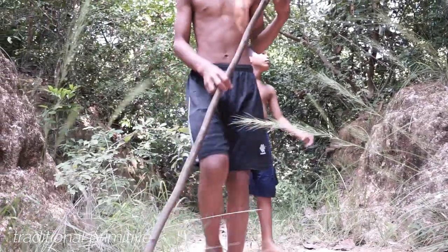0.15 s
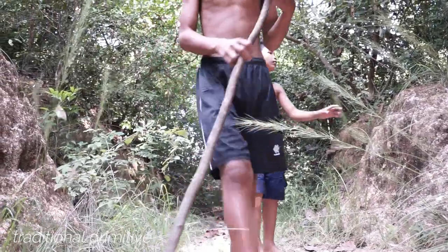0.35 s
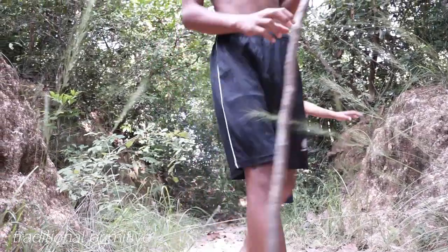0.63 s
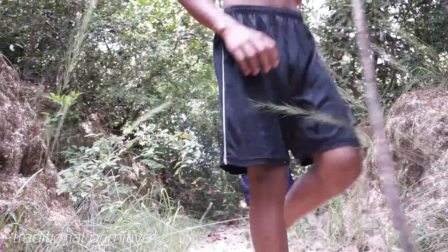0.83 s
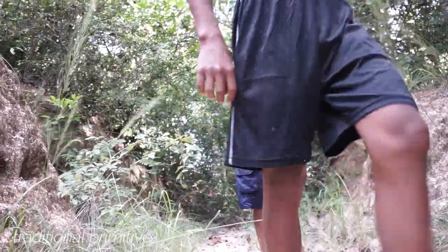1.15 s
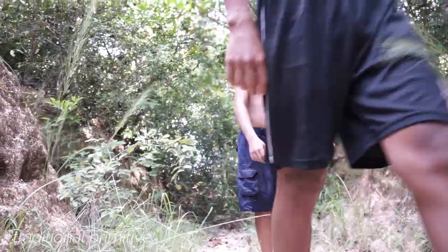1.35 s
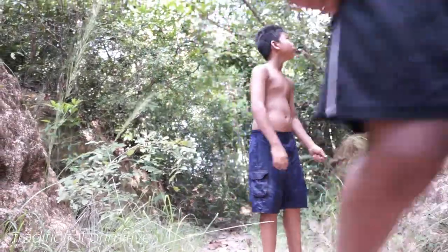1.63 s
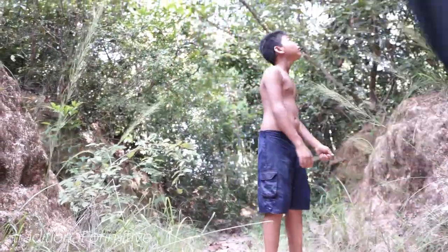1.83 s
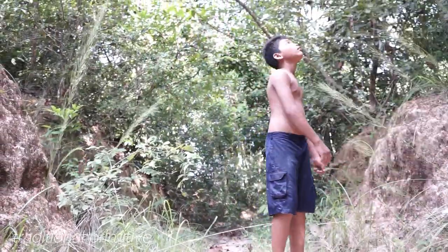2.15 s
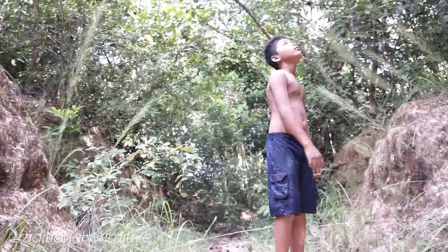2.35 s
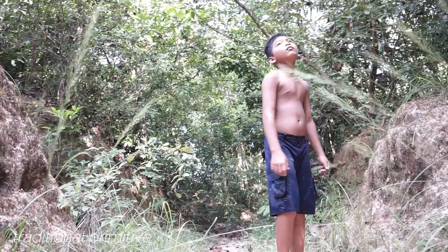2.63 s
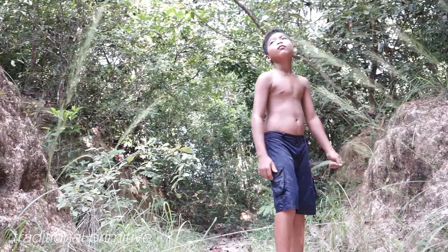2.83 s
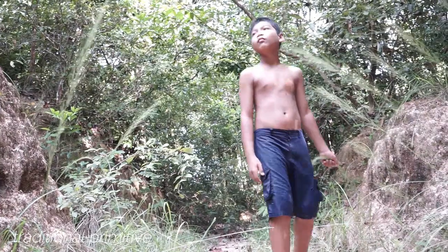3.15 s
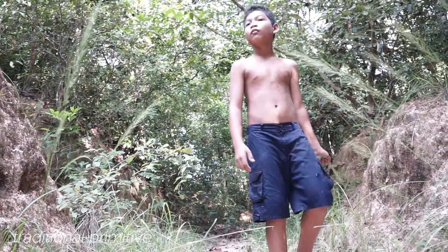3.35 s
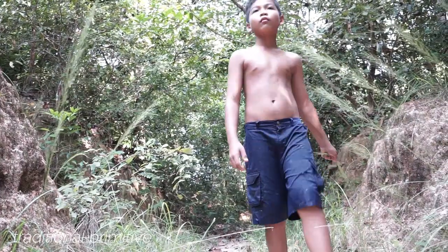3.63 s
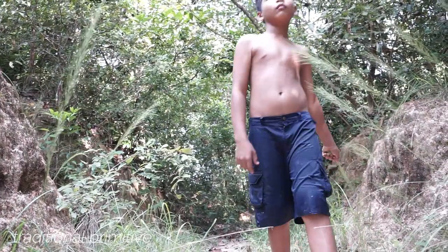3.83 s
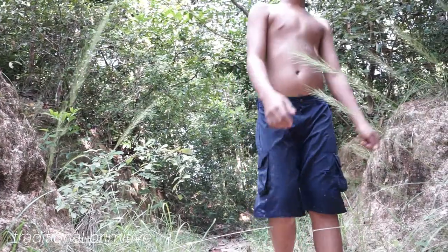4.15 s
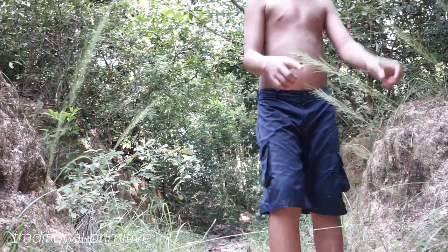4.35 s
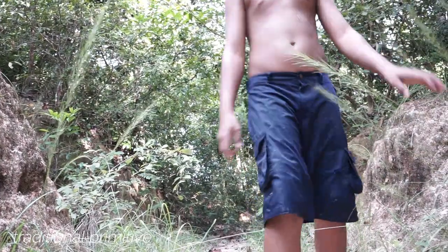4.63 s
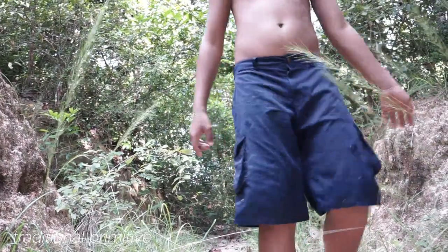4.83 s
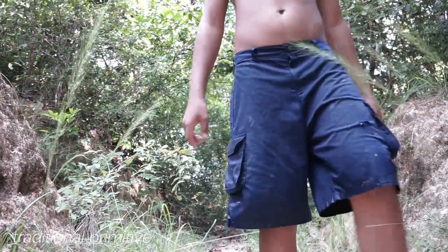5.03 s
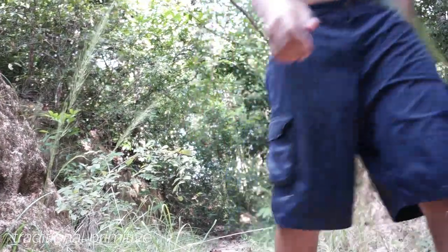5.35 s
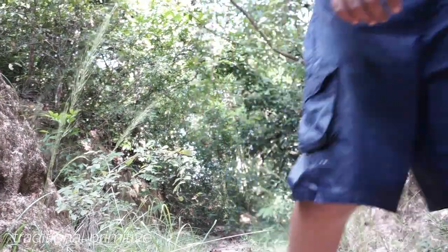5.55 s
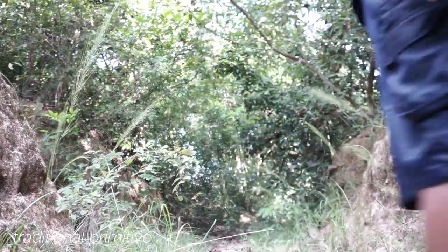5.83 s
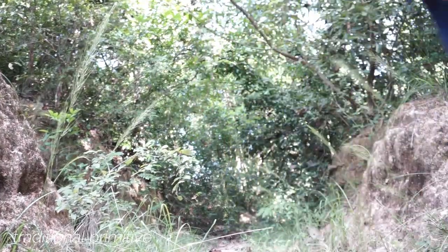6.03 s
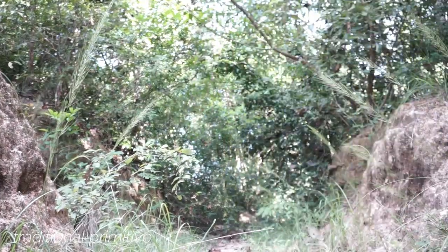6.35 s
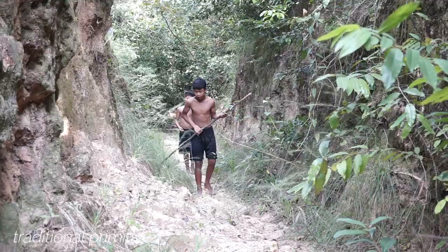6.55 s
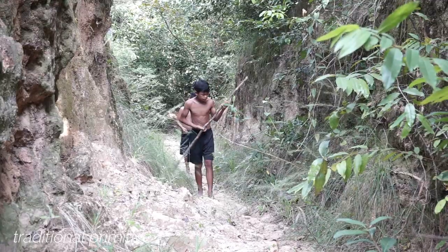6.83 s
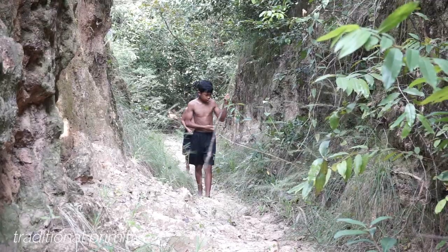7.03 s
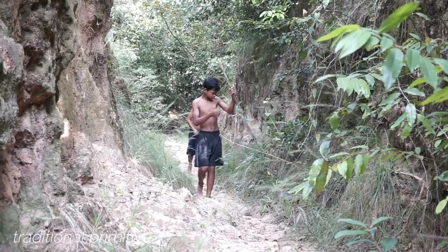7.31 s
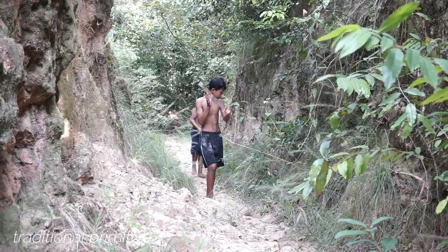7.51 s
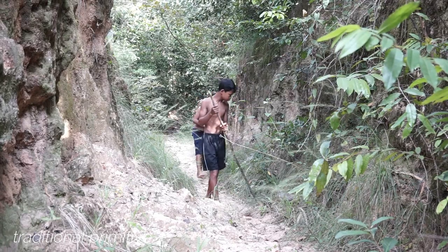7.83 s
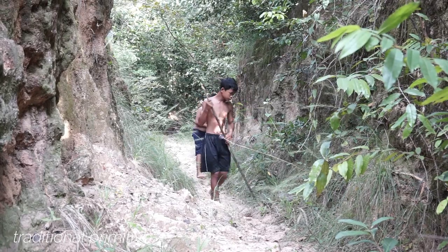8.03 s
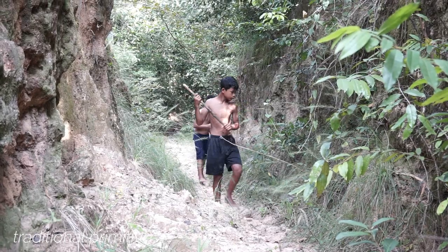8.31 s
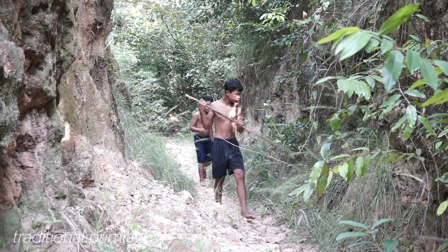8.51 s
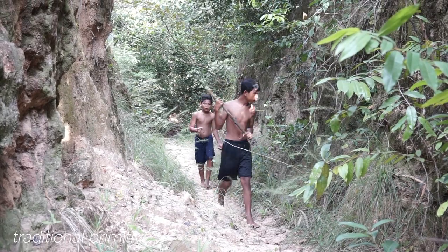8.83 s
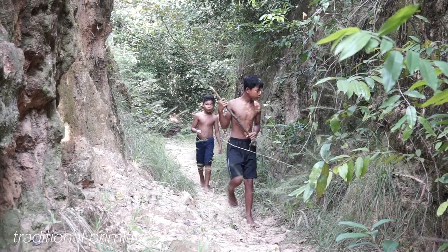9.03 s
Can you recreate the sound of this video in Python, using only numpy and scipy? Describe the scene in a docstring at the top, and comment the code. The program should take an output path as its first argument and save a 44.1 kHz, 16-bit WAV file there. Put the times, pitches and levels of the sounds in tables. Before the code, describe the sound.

Bare feet and legs crunch close by through dry grass and leaf litter, twigs snapping, then distant sparse rustles on a path over a faint engine hum.

```python
"""Litter crackles close by as two walkers pass on the right through dry grass and leaves, then along a far path:
clumped grains, sharp cracks and ringing ticks over smooth noise, pressed up by each crunch of a foot or leg.
Stems and twigs snap as noise bursts in short resonances; heels and a stick thud as clicks that ring the soil.
Below lie the two sine notes of a far engine, and the low rumble and the hiss of the wood as coloured noise.
The microphones are a left-right pair. The sound drops out twice for a moment, and the top is cut."""
import sys
import numpy as np
from scipy import signal
from scipy.io import wavfile

SR = 44100
rng = np.random.default_rng(int(sys.argv[2]) if len(sys.argv) > 2 else 0)


def inscribe(sig):
    """Save sig as 16-bit PCM at rate SR to the path in sys.argv[1].

    A 1-D sig is mono; a 2-D sig holds one channel per row.
    Samples are clipped to [-1, 1] before scaling.
    """
    pcm = np.round(np.clip(np.atleast_2d(sig).T, -1, 1) * 32767)
    wavfile.write(sys.argv[1], SR, pcm.astype(np.int16))


N = 404381
PATH_FROM_S = 6.52   # from here the walkers are far off on the path


def amp(db):
    """Decibels to gain."""
    return 10 ** (np.asarray(db) / 20)


def rms_one(x):
    """Scale to unit rms."""
    return x / np.sqrt(np.mean(x ** 2) + 1e-20)


def in_time(rows):
    """Columns of a curve table, one value per sample."""
    s, *columns = np.transpose(rows)
    return [np.interp(np.arange(N) / SR, s, c) for c in columns]


def at_hz(points, hz):
    """Read a spectrum on a log-frequency axis."""
    f, level = np.transpose(points)
    return np.interp(np.log(hz), np.log(f), level)


def drift(rate_hz):
    """Slow random wander of unit rms, drawn once every 40 samples."""
    step, settle = 40, 2000
    r = np.exp(-2 * np.pi * rate_hz * step / SR)
    noise = rng.standard_normal(N // step + settle + 2)
    slow = signal.lfilter([1], [1, -2 * r, r * r], noise)[settle:]
    return np.interp(np.arange(N) / step, np.arange(len(slow)), rms_one(slow))


def resonance(x, hz, t60):
    """A damped two-pole ring that dies by 60 dB in t60 seconds."""
    r, w = amp(-60 / (t60 * SR)), 2 * np.pi * hz / SR
    return signal.lfilter([1, 0, -1], [1, -2 * r * np.cos(w), r * r], x)


def pan(db):
    """Left and right gains for a level difference."""
    return amp(np.array([db / 2, -db / 2]))


def late_at_left(x, lag):
    """One sound at both ears, reaching the left one later by lag samples."""
    heard = np.clip(np.arange(N) - np.round(lag).astype(int), 0, N - 1)
    return np.array([x[heard], x])


def two_ears(envelope, lag):
    """Two unrelated draws of noise under one envelope: a common sound (later at the left ear) and each ear's own."""
    common, left, right = rng.standard_normal((3, 2, N)) * envelope
    late = [np.interp(np.arange(N) - np.round(lag), np.arange(N), c) for c in common]
    return np.stack([late, common, left, right], axis=1)


def bands(source, edges, gain_at):
    """Colour the four signals band by band and blend common with own sound."""
    # how alike the two microphones hear a distant or near sound: f/Hz, share of power common to both ears
    likeness = [(50, 1), (130, 0.78), (300, 0.52), (600, 0.53), (1200, 0.4), (2500, 0.39), (5000, 0.29),
                (10000, 0.33)]
    out = 0
    for k, (low, high) in enumerate(zip(edges, edges[1:])):
        band = signal.butter(2, [low, high], "band", fs=SR, output="sos")
        y = signal.sosfilt(band, source[k % 2])   # neighbouring bands use unrelated draws
        hz = np.sqrt(low * high)
        alike = at_hz(likeness, hz)
        out = out + gain_at(hz) * (np.sqrt(alike) * y[:2] + np.sqrt(1 - alike) * y[2:])
    return out


def hiss():
    """The steady far hiss of the wood: noise of fixed colour and level."""
    # colour of the hiss: f/Hz, relative level/dB per Hz
    hiss_tone = [(47, -30), (80, 0), (118, -15), (239, -24.5), (288, -26), (369, -23), (1060, -32.5),
                 (1300, -28), (6370, -29), (10500, -30), (11100, -27), (14500, -58), (22000, -120)]
    edges = 100 * 2 ** np.arange(0, 7.1, .5)
    noise = bands(two_ears(1, 0), edges, lambda hz: amp(at_hz(hiss_tone, hz)))
    return amp(-61) * rms_one(noise)


def rumble():
    """A low broad rumble, noise that is largely alike in both ears and slowly changes level."""
    # strength of the rumble: t/s, rms level/dB
    rumble_level = [(0, -57.5), (1.33, -54.5), (1.99, -52), (2.8, -55.5), (3.06, -50), (3.6, -53.5),
                    (5.2, -52), (5.87, -56.5), (6.46, -49), (6.56, -64.5), (7.48, -54.5), (9.17, -55.5)]
    # colour of the rumble: f/Hz, relative level/dB per Hz
    rumble_tone = [(20, -3), (30, -5.5), (42, 1.5), (58, 6), (70, -1.5), (100, -10), (160, -20.5),
                   (250, -25)]
    edges = 20 * 2 ** np.arange(0, 3.7, .4)
    low = bands(two_ears(1, 0), edges, lambda hz: amp(at_hz(rumble_tone, hz)))
    return amp(in_time(rumble_level)[0]) * rms_one(low)


def drone():
    """Two low sine notes of the far engine, about a fifth apart, wavering together in pitch."""
    # main note of the engine before it wavers: t/s, f/Hz, rms level/dB
    engine_note = [(0, 48, -57.5), (.55, 42.84, -51), (1.2, 43.37, -50), (1.5, 43.83, -61),
                   (2.2, 43.03, -45.5), (2.7, 43.04, -50), (3.2, 42.64, -45), (3.6, 44.2, -53),
                   (4.6, 45.8, -49.5), (5.4, 46.1, -52.5), (5.7, 46.4, -71), (6.6, 47.97, -68),
                   (7.0, 48, -54.5), (7.7, 48.6, -57.5), (8.2, 49.5, -51.5), (9.17, 51, -52)]
    hz, main_db = in_time(engine_note)
    # the lower note is heard best once the walkers are on the path
    low_db = np.where(np.arange(N) / SR > PATH_FROM_S, -59.5, -72)
    phase = 2 * np.pi * np.cumsum(hz * (1 + .015 * drift(3.0))) / SR
    main_note = amp(main_db + 1.5 * drift(4)) * np.sin(phase)
    low_note = amp(low_db) * np.sin(.68 * phase)
    return np.sqrt(2) * (main_note + low_note)   # rms to peak of a sine


def thuds():
    """A contact click with a short woody knock, then the packed soil pushes back and rings briefly."""
    # heel and stick on soil: t/s, contact click level/dB, soil f/Hz, soil level/dB re click, left-right level/dB
    contacts = [(.524, -22.5, 285, -8, -1.5), (1.124, -33.5, 523, -10.5, -1.5),
                (1.597, -22.5, 297, -9, -1.5), (1.831, -31.5, 710, -6, -4), (2.469, -34.5, 148, -3, -1.5),
                (2.533, -22, 386, -8, -5), (2.853, -31.5, 526, -3, -6), (2.912, -27, 1000, -3, -9),
                (3.156, -20.5, 337, -8.5, -6), (3.193, -16.5, 696, -5, -7), (3.52, -31.5, 360, -5.5, -5),
                (4.245, -30, 400, -8, -3), (4.262, -38, 190, -6, -1.5), (4.329, -28, 900, -4, -3),
                (4.424, -29, 380, -8, -3), (5.295, -33, 220, -7, -1.5), (6.099, -19.5, 294, -8.5, -1.5),
                (6.178, -35, 231, -6, -1.5), (6.208, -35.5, 198, -8, -1.5), (6.329, -37.5, 700, -4, -4),
                (6.419, -36.5, 640, -2, -4)]
    thump_db = -19   # deep thump, re click
    soil_cycles, soil_extra_s = 4, .02   # the soil dies by 60 dB in these cycles plus this time
    length = 6000
    out = np.zeros((2, N + length))
    click, push = np.zeros((2, length))
    click[:14] = -np.hanning(14)
    push[40:140] = np.hanning(100)
    knock = resonance(click, 2000, .006)
    click = click + 0.25 * knock / np.abs(knock).max()
    deep = resonance(push, 158, 0.031)
    thump = amp(thump_db) * deep / np.abs(deep).max()
    for s, click_db, hz, soil_db, pan_db in contacts:
        # high soil notes are struck by the click, low ones by the slower push
        soil = resonance(push if hz < 800 else click, hz, soil_cycles / hz + soil_extra_s)
        body = amp(soil_db) * soil / np.abs(soil).max() + thump
        at = round(s * SR)
        out[:, at:at + length] += amp(click_db) * (click + body) * pan(pan_db)[:, None]
    return out[:, :N]


def snaps(lag):
    """A stem frays and breaks: one crack, then splinters, into its own short ring, with a bright top."""
    # snapping stems: t/s, peak level/dB before panning, ring f/Hz, broad splinters level/dB re ring,
    # treble level/dB re ring, left-right level/dB
    stems = [(0.046, -26, 2780, -1, -10, 5), (0.057, -22.5, 3360, -6, -12, -2),
             (.1375, -22.5, 8400, -8.5, -9.5, 6), (.2946, -27.5, 2850, 3, -14, 0.5),
             (0.389, -25.5, 6070, 19, -3, 4.5), (0.434, -23, 4090, 4, -15, -1.5),
             (.586, -24, 4760, -2.5, -13, 0.5), (0.6744, -23, 2630, -6, -18, 2),
             (0.6874, -23, 3280, -4.5, -19, 1), (0.859, -29, 5110, 6, -22, 1),
             (1.184, -34, 3500, -11, -16, 10), (1.247, -19, 4100, -21, -25, -4.5),
             (1.372, -25, 5160, -11, -12, 0), (1.4767, -25, 5550, -5, -13, 2),
             (1.608, -24.5, 5310, -3, -9, -2.5), (1.6272, -27.5, 3140, -6, -13, -7),
             (1.6506, -15.5, 2420, 5, -14, 2), (1.7195, -28, 3800, -10, -14, -8),
             (1.751, -19.5, 3600, 2, -16, -5), (1.7813, -25, 3960, -11, -13, -2),
             (1.832, -16.5, 3200, 13, -15, -5), (1.8455, -21, 4720, -6, -13, -10),
             (1.8564, -18, 3200, -6, -15, -4), (1.933, -24, 8270, -6, -7, -16),
             (1.991, -31, 4160, -2, -13, -8), (2.1872, -27.5, 3170, -5, -19, -19),
             (2.5043, -39, 1400, -6, -15, -11), (2.5186, -30, 910, -6, -15, -12),
             (2.5324, -12.5, 1930, -4, -8, 2), (2.5383, -18, 1900, -13, -23, -1),
             (2.841, -30, 2000, -6, -16, -12), (2.8508, -27, 3350, -6, -16, -15),
             (2.912, -13.5, 4020, -12, -15, 5), (2.948, -15, 5280, -15, -17, 2),
             (3.0048, -20, 1020, -1, -17, -9), (3.055, -20.5, 4340, -16.5, -10, -17.5),
             (3.1617, -19, 1900, -20, -23, -10.5), (3.193, -18.5, 1150, -16, -22, -14),
             (3.213, -14, 2050, -20, -24, -11), (3.2207, -15, 2090, -20, -20, 8),
             (3.2286, -10.5, 2250, -26, -20, -1), (3.3608, -24, 2860, -6, -17, -3),
             (3.4115, -25, 5050, -11.5, -19, -10), (3.482, -10.5, 5040, 1, -15.5, -3.5),
             (3.507, -16, 5760, -10, -12, 9), (3.5252, -11, 4500, 6, -1, -4),
             (3.5543, -27, 6260, -3, -10, 0), (3.5691, -16.5, 5640, 10, 8, -2),
             (3.64, -23.5, 5740, -1, -14, 1), (3.699, -27, 5880, 3, -10, -3),
             (3.7297, -15, 5800, 18, -14, -3.5), (3.7772, -15.5, 1900, 1, -16, -5),
             (3.7827, -12.5, 2100, -15, -21, -10), (3.7872, -15, 1740, -6, -22, -13),
             (3.857, -15, 6100, -6, -13, 1), (4.0107, -27.5, 1770, -1, -16, -10),
             (4.0602, -27, 1803, -9, -17, -10.5), (4.1676, -18, 2390, -4, -23, -4),
             (4.1884, -25, 2625, -9, -22, 5), (4.2276, -22, 2010, -14, -12, -9),
             (4.236, -23, 2830, -6, -18, 0), (4.329, -19, 2900, 4, -13, 4.5),
             (4.1585, -25, 2800, 0, -13, -2), (4.411, -23, 1420, 8, -6, -8),
             (4.4926, -30.5, 3890, -18, -21, -7), (4.7099, -16, 8460, -2, -4, -3.5),
             (4.9925, -26.5, 3580, 1.5, -16, -4), (5.2039, -23, 7720, -3, -10, 0),
             (5.2085, -17, 8200, 0, -8, 0), (5.223, -24, 8000, -3, -8, 0), (5.231, -26, 8000, -3, -8, 1),
             (5.295, -15, 6960, 10, -9, -8), (5.5268, -32, 3630, -8, -12, -11),
             (5.5615, -29.5, 3960, -17, -12, -9), (5.698, -34, 5770, 0, -11, -1.5),
             (6.0985, -20.5, 2070, -15, -18, 12), (6.1782, -26.5, 1456, 1, -17, -6),
             (6.6388, -42, 4960, -7, -17, 0), (6.759, -32, 7000, -7, -10, -1),
             (6.777, -22, 4710, -5, -15, -2), (6.793, -26, 4054, -13, -12, -4),
             (7.6305, -32, 9090, -2, -14, -4), (7.655, -32, 8960, -1.5, -12.5, -3),
             (7.8007, -22, 7030, -6.5, -12, 3), (8.297, -27, 8860, -2, -13, -7),
             (8.7842, -32, 8630, -3, -12, -13), (8.839, -23.5, 8830, -4, -19, -6),
             (8.8674, -22.5, 3600, -15, -12, -4), (8.8994, -28, 8490, 0, -13, -3),
             (9.11, -43, 6130, -6.5, -12, -3.5)]
    ring_cycles = 13.3   # the ring dies by 60 dB in these cycles
    fray_s = .0006   # fibres give ahead of the crack, swelling 10 dB in this time
    tear_s, snap_t60_s = 0.0028, 0.016   # time a stem tears, then dies by 60 dB
    splinter_spread_db = 2.5
    ahead, length = 200, 3000   # samples before the crack, samples in all
    out = np.zeros((2, N + 6000))
    t = (np.arange(length) - ahead) / SR
    bright = signal.butter(2, 5500, "high", fs=SR, output="sos")
    shape = amp(10 * np.minimum(t, 0) / fray_s - 60 * np.maximum(t - tear_s, 0) / snap_t60_s)
    for s, peak_db, hz, broad_db, treble_db, pan_db in stems:
        common, left, right, uneven = rng.standard_normal((4, length))
        common[ahead] = 3.6   # the first crack
        splinters = amp(splinter_spread_db * np.repeat(uneven[::20], 20))
        burst = np.array([common + .5 * left, common + .5 * right]) * shape * splinters
        ring = resonance(burst, hz, ring_cycles / hz)
        broad = resonance(burst, 2900, 0.00029)
        treble = signal.sosfilt(bright, burst)
        sound = rms_one(ring) + amp(broad_db) * rms_one(broad) + amp(treble_db) * rms_one(treble)
        sound = sound / np.abs(sound).max() * amp(peak_db) * pan(pan_db)[:, None]
        at = round(s * SR)
        late = at + round(lag[min(at, N - 1)])
        out[0, late:late + length] += sound[0]
        out[1, at:at + length] += sound[1]
    return out[:, ahead:N + ahead]


def twig_ticks(lag):
    """Dry twigs of many sizes tick at random, each size ringing briefly at its own pitch."""
    ticks_per_s, tick_cycles = 25, 24   # for each size of twig; cycles to die by 60 dB
    out = 0
    for hz in np.geomspace(600, 9000, 16):
        born = rng.random(N) < ticks_per_s / SR
        count = born.sum()
        clicks = np.zeros(N) + 1e-18
        clicks[born] = amp(7.3 * np.minimum(rng.exponential(1, count), 3)) * rng.choice([-1, 1], count)
        out = out + rms_one(resonance(clicks, hz, tick_cycles / hz)) * np.sqrt(hz / 4000)
    return amp(-18.5) * late_at_left(out, lag)


def leaf_cracks(lag):
    """Lone dry leaves crack at random in clumps, as single samples, a few much larger than the rest."""
    cracks_per_s = 250 * amp(5.0 * drift(20))
    born = rng.random(N) < cracks_per_s / SR
    size_db = 13 + 4.5 * np.minimum(rng.exponential(1, N), 3)
    return late_at_left(born * amp(size_db) * rng.choice([-1, 1], N), lag)


def tread():
    """Levels of five regions of the crackle and its bearing: steady brushing plus every crunch, added as power."""
    # legs brushing through the litter: t/s, crackle level/dB, deep give of the soil level/dB,
    # weight of the tread level/dB re crackle, fine grass level/dB re crackle,
    # left-right of the tread/dB re that of the crackle, left-right level/dB
    brushing = [(0, -49.5, -60, -6, 2.5, 0.5, 1.5), (.9, -50.5, -57, -6.5, -5, 0, -0.5),
                (1.3, -49, -59, -11, 1, 1, -3), (2.051, -50, -61, -8, -3, -1, -2.5),
                (2.6, -52, -58.5, -7, -3.5, -2, 0), (3.0, -45, -62, -11, -9, -6, 1),
                (3.6, -44.5, -61.5, -7.5, -0.5, -4.5, -2), (4.25, -43.5, -56, -10.5, -4.5, -2.5, 1),
                (4.6, -50.5, -60.5, -9.5, -3, 1, -2.5), (5.4, -51, -58.5, -4.5, -8.5, 2, -2.5),
                (6.05, -57, -58, -3.5, -0.5, 1, -2), (6.5, -54.5, -54, 0, -6, -3, -3.5),
                (6.54, -69, -80, -15, 10, 0, -1), (6.9, -56, -83, -15, 8.5, 0, -1),
                (7.1, -70, -76, -3, 7.5, 0, -3), (7.6, -74, -64, 8, 6, 3, -4),
                (7.9, -60.5, -67, -4, 5, 0, -2), (9.17, -58, -65, -5, 5, 1.5, -2)]
    # a foot or leg presses the litter: peak t/s, crackle level/dB, swell by 10 dB/s, fade by 10 dB/s
    # (2 ms at least for both), then re crackle: weight of the tread level/dB, coarse leaves level/dB,
    # fine grass level/dB; left-right level/dB
    crunches = [(.009, -34, .03, .012, -14.5, -6, 3.5, -1), (.058, -34, .02, .035, -13, -8.5, -3, 1),
                (.14, -41, .08, .05, -13, -6, 0, 1), (.435, -37, .004, 0.07, -10.5, -3.5, -10, 1),
                (.59, -40, 0, 0.02, -12, -7, -2, 0), (0.689, -37.5, 0.06, 0.0546, -8, -1, -6, 0.5),
                (1.13, -46.5, -0.2, 0.05, -11, -6, 4, -3), (1.251, -35.5, .006, 0, -33, -19, 4, -1),
                (1.5, -45.5, 0.2, 0.2, -12, -7, -7, 0), (1.65, -35.5, 0.0052, 0.05, -13, -6, -3, -4),
                (1.78, -34, 0.05, 0.13, -19, -12, -4, -3), (1.845, -27, 0.01, .05, -20, -12, -9, -3),
                (1.868, -28, .03, .018, -18.5, -11, -9, -2.5), (2.189, -32, .008, .03, -16, -10, -15, -2),
                (2.25, -34.5, 0.11, 0.09, -14, -7.5, -8.5, -2),
                (2.458, -35.5, 0.0552, 0.06, -11.5, -6.5, -8, -5.5), (2.506, -44, .003, .04, 3, 3, -4, -9),
                (2.54, -40, .008, .03, -3, 7.5, -5, -6.5), (2.585, -44, .07, .008, -6, 6, -4, -9),
                (2.711, -39, .06, -0.1, -10, -4.5, -11.5, -2), (2.74, -44, -0.05, -0.2, 1, 9.5, -9, -7),
                (2.842, -37, .006, .15, -6, 0, -10, -4), (2.913, -28, .004, .04, -8, -3.5, -11, -6),
                (2.96, -33, .05, .05, -10, -3.5, -7, -5), (3.005, -29.5, .04, .015, -12, -2, -9, -3.5),
                (3.056, -33, .005, .05, -10, -2, -7, -2), (3.125, -31, .09, .012, -13.5, -2.5, -6, -2),
                (3.15, -37, .02, .09, -14, -4, -8, -4), (3.169, -36, .02, 0.0437, 2.5, 6, -10, -6),
                (3.23, -25, .07, 0.02, -6, -0.5, -16, -1.5),
                (3.389, -37.5, 0.13, 0.15, -16, -10, -6.5, -2.5),
                (3.484, -26, .005, -0.0146, -20, -14, -7, -5), (3.509, -29, .015, .01, -16, -14, -5, -3),
                (3.53, -37, -0.02, 0.13, -13, -4, -2.5, -3), (3.571, -37, .003, .05, -8, 0, -3, -3),
                (3.787, -27.5, 0.0547, 0.0321, -10.5, -3.5, -7.5, -0.5),
                (3.86, -35, 0.12, 0.16, -12, -3, -1, -2.5), (4.06, -43.5, -0.13, -0.04, -4, 4.5, -8, -7),
                (4.1, -37, .07, .2, -15, -5, -5, -1.5), (4.21, -38, 0.12, .12, -6.5, 0, -15, -2),
                (4.331, -27, 0, 0.0178, -5.5, -2.5, -6.5, 1.5), (4.412, -40, .003, .03, 0, 3, 0, -3),
                (4.435, -44, .03, .02, 6, 4, -5, -3), (4.8, -43.5, .2, .025, -7, -1.5, -9, -2),
                (5.0, -42.5, -0.05, 0.19, -12, -10, -5, -2.5), (5.208, -37, .015, .05, -12, -6, 6, -3),
                (5.3, -37.5, -0.03, 0.04, -12, -10, -7, -3), (5.531, -44, 0.1, .13, -18.5, -7, -1.5, -2),
                (6.099, -32.5, 0, 0.02, -4.5, 0, -5, -7), (6.179, -44.5, -0.03, 0, 3, 2, -2, -3.5),
                (6.3, -48, 0.25, .16, -2.5, -1.5, -3, -3.5), (6.689, -47, -0.04, 0.07, -29, -13, -5, 0),
                (6.78, -36, 0, 0.05, -30, -13.5, -0.5, -2.5), (7.31, -61, -0.06, 0.35, -16, -12, 1, -2.5),
                (7.45, -54.5, -0.05, 0, -21.5, -7, -0.5, -4), (7.64, -56.5, .012, 0.14, -3, 1, 6, -4),
                (7.73, -46, 0.06, 0.07, -9, -5.5, 6, -1), (7.803, -41, .015, .025, -19, -8, 7, -3),
                (7.84, -47, .05, .04, -20, -8, 4, -2), (8.26, -54, .15, .1, -9, -7, 7, -2),
                (8.297, -48, .006, 0.06, -13, -18, 7.5, -3), (8.43, -50, .2, .07, -7.5, -3, 5.5, 0.5),
                (8.6, -53.5, 0.03, -0.1, -7, -3, 3, -3), (8.785, -48, .006, .15, -10, -5.5, 7, -11),
                (8.868, -45, .06, .06, -10, -3, 4, -2), (8.93, -47, .1, .07, -10, -1.5, 5, -1.5),
                (9.12, -53, 0.03, 0, -10, -3, 7.5, -4)]
    coarse_follows, coarse_db = 0.59, 1.5   # brushed coarse leaves: this share of the tread's weight, plus dB
    soil_give_db = -16   # the soil under a crunch, re the weight of the tread
    t = np.arange(0, N, 32) / SR
    s, *columns = np.transpose(brushing)
    level_db, deep_db, weight_db, fine_db, low_pan_db, pan_db = [np.interp(t, s, c) for c in columns]
    coarse_level_db = level_db + coarse_follows * weight_db + coarse_db
    power = amp(2 * np.array([deep_db, level_db + weight_db, coarse_level_db, level_db, level_db + fine_db]))
    # the bearing is averaged by power, for the tread (row 1) and the crackle (row 3)
    sides = power[[1, 3]] * pan_db
    for s, db, swell, fade, weight, coarse, fine, side_db in crunches:
        shape_db = db - 10 * np.where(t < s, (s - t) / max(swell, .002), (t - s) / max(fade, .002))
        colour = amp(2 * np.array([weight + soil_give_db, weight, coarse, 0, fine]))
        pressed = colour[:, None] * amp(2 * shape_db)
        power = power + pressed
        sides = sides + pressed[[1, 3]] * side_db
    sides = sides / power[[1, 3]] + [low_pan_db, 0 * t]
    *levels_db, low_side_db, side_db = in_time(np.vstack([t, 10 * np.log10(power), sides]).T)
    return levels_db, low_side_db, side_db


def litter(lag):
    """Leaves crack in clumped grains over a smooth brushing; the tread shifts its colour."""
    # finer colour of the crackle: f/Hz, level/dB per Hz
    crackle_tone = [(120, 19), (250, 17), (500, 13), (750, 13.5), (1000, 8.5), (1400, 11), (2000, 9),
                    (3000, 10), (4500, 10), (6500, 10), (8500, 5), (11000, 9.5)]
    # tilt of the microphone pair: f/Hz, left-right level/dB
    pair_tilt = [(5000, 0.5), (8000, 1.5), (11000, -2.5)]
    levels_db, low_pan_db, pan_db = tread()
    sizes = amp(5 * np.minimum(rng.exponential(1, N), 4))
    grains_per_s = 1100 * amp(4.0 * drift(25))   # the wander clumps them
    born = rng.random(N) < grains_per_s / SR
    grain_t60_s = 0.013
    grains = signal.lfilter([1], [1, -amp(-60 / (grain_t60_s * SR))], sizes * born + 1e-18)
    # share of smooth brushing, larger from afar
    smooth = np.where(np.arange(N) / SR > PATH_FROM_S, .88, 0.63)
    envelope = np.sqrt(smooth + (1 - smooth) * rms_one(grains) ** 2)
    centres = np.log([180, 650, 1850, 4300, 9000])   # Hz: soil, tread, coarse leaves, crackle, fine grass

    def gain_at(hz):
        """Left and right gain of one band, with a slight flicker of its own."""
        shares = [np.interp(np.log(hz), centres, row) for row in np.eye(len(centres))]
        level_db = sum(share * db for share, db in zip(shares, levels_db))
        side_db = (low_pan_db if 400 < hz < 1800 else pan_db) + at_hz(pair_tilt, hz)
        return pan(side_db) * amp(level_db + at_hz(crackle_tone, hz) + 1.69 * drift(10.2))

    source = two_ears(envelope, lag)
    source[:, :2] += (twig_ticks(lag) + leaf_cracks(lag)) * np.sqrt(1 - smooth)
    return bands(source, 100 * 2 ** np.arange(0, 7.1, .5), gain_at)


def ground_echo(x):
    """From afar the path sends a dull second arrival just behind the first and combs the sound."""
    dull = signal.sosfilt(signal.butter(1, 3500, fs=SR, output="sos"), x)
    echo = .35 * np.roll(dull, 33, axis=1)   # 33 samples, 0.75 ms
    return np.where(np.arange(N) / SR > PATH_FROM_S, x + echo, x)


def scene():
    """The walkers' litter, snaps and thuds over the far engine, the rumble and the hiss."""
    # where the feet are: t/s, lag of the left ear/ms
    bearing = [(0, -0.019), (.7, 0.038), (1.2, 0.11), (2.3, 0.081), (2.6, -0.076), (3.2, -0.13),
               (3.5, -0.008), (3.8, -0.072), (4.3, 0.039), (5.2, .12), (6.4, 0.13), (6.6, -0.034), (9.2, 0)]
    lag = in_time(bearing)[0] * SR / 1000   # samples
    background = hiss() + rumble() + drone()
    return background + thuds() + snaps(lag) + ground_echo(litter(lag))


def record(dry):
    """The sound falls away during each dropout and then returns; the top is cut steeply at 11 kHz."""
    # dropouts: start t/s, end t/s, first level/dB, last level/dB, level/dB at the return, time to settle/s
    dropouts = [(5.863, 5.902, -13.5, -42, 1, .01), (6.507, 6.546, -8, -26, -12, 0.13)]
    t, gain_db = np.arange(N) / SR, np.zeros(N)
    for start, end, first_db, last_db, back_db, settle in dropouts:
        times = [start, start + .001, end, end + 0.001, end + .002 + settle]
        gain_db += np.interp(t, times, [0, first_db, last_db, back_db, 0])
    steep = signal.ellip(12, .5, 90, 11000, fs=SR, output="sos")
    return signal.sosfilt(steep, dry * amp(gain_db))


dry = scene()
out = record(dry)
inscribe(out)
```